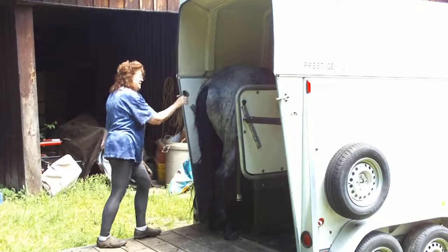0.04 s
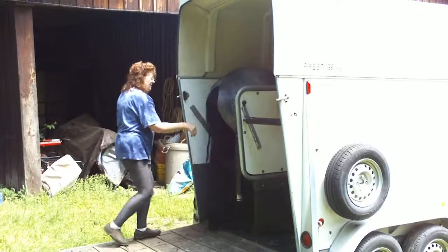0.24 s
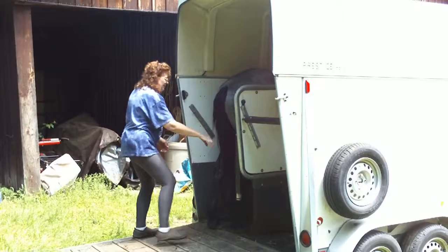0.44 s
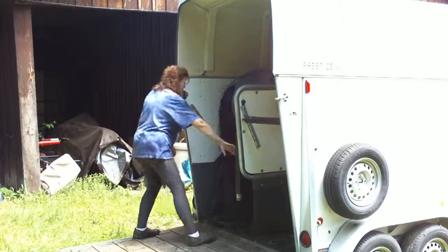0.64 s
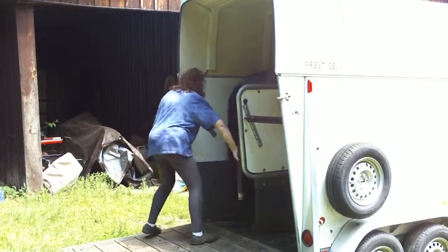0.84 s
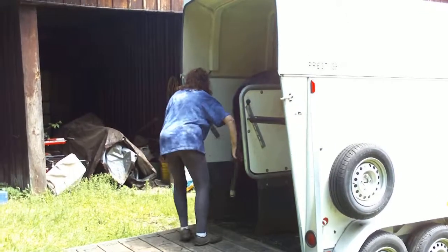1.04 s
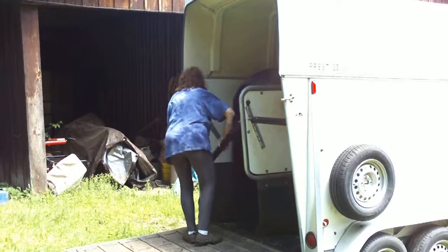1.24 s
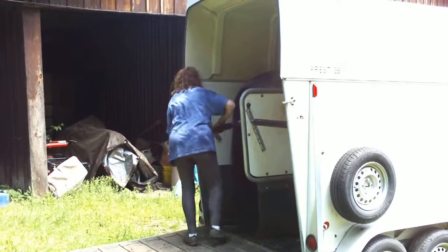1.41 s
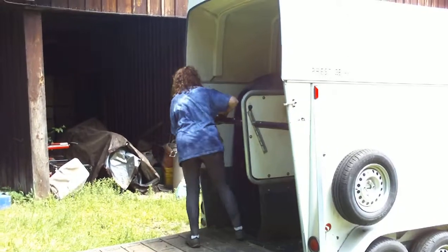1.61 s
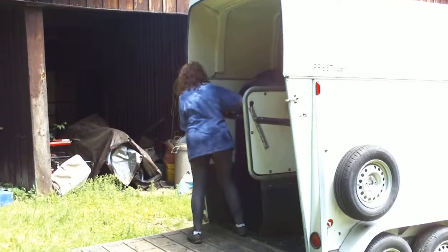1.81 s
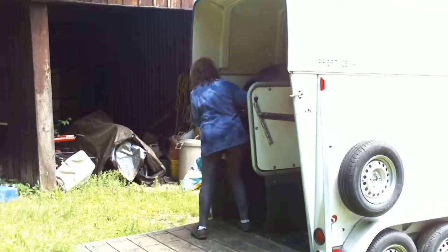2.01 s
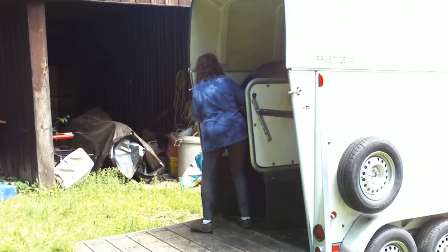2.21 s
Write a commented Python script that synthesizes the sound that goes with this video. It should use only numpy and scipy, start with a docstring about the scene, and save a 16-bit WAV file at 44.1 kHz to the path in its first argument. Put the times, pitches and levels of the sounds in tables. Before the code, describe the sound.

A horse's hooves thump on a hollow trailer floor at about 0.2, 0.5 and 0.7 seconds, then more lightly at 1.1, each with a deep boom, amid faint squeaky scuffs. From 1.1 to 1.8 seconds a metal bar scrapes across, knocking on the frame around 1.4. At 1.9 it drops into its catch with a loud rattling clank. A low rumble and soft rustle lie underneath, outdoors.

```python
"""Outdoors, over the rumble of a rocking trailer and a soft rustle, a horse stamps: each hoof clops on
the boards and sets the sprung floor booming, amid squeaky scuffs of shoes and fittings. Then a bar slides
across behind it, scraping by stick-slip friction and knocking on the frame. After a faint low groan the
bar drops into its catch with a rattling clank. Throughout, a camera that holds each sample at a low rate
adds a thin fizz above every sound."""
import sys
import numpy as np
from scipy import signal
from scipy.fft import rfft, irfft, next_fast_len
from scipy.io import wavfile

SR = 44100
rng = np.random.default_rng(int(sys.argv[2]) if len(sys.argv) > 2 else 0)


def master_out(mix):
    """Clip the mix to full scale and print it as 16-bit PCM to the path in sys.argv[1]."""
    frames = np.transpose(np.atleast_2d(mix))
    ceiling = np.clip(frames, -1, 1)
    pcm = np.round(ceiling * 32767).astype(np.int16)
    wavfile.write(sys.argv[1], SR, pcm)


N = 103635
T = np.arange(N) / SR


def amp(db):
    """The decibel law: a level as an amplitude gain."""
    return 10 ** (np.asarray(db) / 20)


def unit(x):
    """Normalisation to rms 1."""
    return x / np.sqrt(np.mean(x ** 2) + 1e-20)


def read(points, hz):
    """Interpolation of a table on a log-frequency axis."""
    f, value = np.transpose(points)
    return np.interp(np.log(hz + 1), np.log(f + 1), value)


def envelope(points):
    """Amplitude envelope: a decibel curve as gain over time."""
    return amp(np.interp(T, *np.transpose(points)))


def add(mix, onset, sound):
    """Superposition: a sound joins the mix at its onset, in seconds."""
    part = mix[max(round(onset * SR), 0):][:len(sound)]
    part += sound[:len(part)]


def fade(t60, t=T):
    """Exponential damping: 60 dB down after t60 seconds."""
    return np.exp(-np.log(1000) * t / np.maximum(t60, 1e-3))


def colour(x, spectrum):
    """Linear filtering by a spectrum, normalised to rms 1."""
    size = next_fast_len(N)
    gain = amp(read(spectrum, np.fft.rfftfreq(size, 1 / SR)))
    return unit(irfft(rfft(x, size) * gain, size)[:N])


def noise(spectrum):
    """Stationary Gaussian noise, filtered to a spectrum."""
    return colour(rng.standard_normal(N), spectrum)


def dense_ring(spectrum):
    """Frequency-dependent damping: overlapping modes ring as noise whose treble dies first."""
    # damping of the ringing (frequency [Hz], t60 [s])
    decay_times = [(100, 0.64), (400, 0.39), (1100, 0.37), (2500, 0.39), (5000, 0.28)]
    hz, t, bands = signal.stft(noise(spectrum), SR, nperseg=256)
    damping = fade(read(decay_times, hz)[:, None], t)
    return signal.istft(bands * damping, SR, nperseg=256)[1][:N]


def background():
    """Amplitude-modulated noise: the rocking trailer rumbles under a soft rustle."""
    # swells of the rumble (time [s], level [dB])
    rocking = [(0, -25), (.13, -40.5), (.46, -35), (.95, -28), (1.05, -35.5), (1.45, -27), (1.56, -35.5),
               (1.76, -31), (1.88, -47), (2.0, -39.5), (2.24, -30.5), (2.33, -50)]
    # its spectrum (frequency [Hz], relative level [dB])
    rumble_spectrum = [(20, -21), (34, 13), (50, -9.5), (65, 0.5), (140, -19), (600, -67.5)]
    # swells of the rustle (time [s], level [dB])
    rustle = [(.98, -53.5), (1.05, -56), (1.15, -52), (1.72, -53), (1.85, -55), (2.11, -49), (2.21, -52)]
    # its spectrum (frequency [Hz], relative level [dB])
    rustle_spectrum = [(60, -13.5), (200, 3), (450, -6), (1000, -10.5), (1900, -21), (5600, -29.5)]
    return envelope(rocking) * noise(rumble_spectrum) + envelope(rustle) * noise(rustle_spectrum)


def groan(onset=1.68, length=0.188, hz=138, db=-39.5):
    """A low pure tone swells and fades under an arched envelope."""
    progress = np.clip((T - onset) / length, 0, 1)
    arch = np.sqrt(abs(np.sin(np.pi * progress)))
    return amp(db) * arch * np.sin(2 * np.pi * hz * T)


def scuffs():
    """Friction of shoes and fittings: brushing noise and a rough squeak of falling pitch."""
    # strokes (time [s], length [s], brush level [dB], squeak level [dB])
    strokes = [(0.102, 0.07, -53.5, -51.5), (0.366, 0.076, -55.5, -54), (0.954, 0.056, -57, -88),
               (1.073, 0.07, -59.5, -60), (1.199, 0.065, -57.5, -63)]
    # brushing noise (frequency [Hz], relative level [dB])
    brush_spectrum = [(400, -12), (1600, -6), (3100, -3.5), (3700, -10), (6000, -18.5)]
    squeak_hz, sag_hz_per_s, width_hz, edge_s = 2843, 2600, 170, 0.017
    pole = np.exp(-np.pi * width_hz / SR)
    out = np.zeros(N)
    for onset, length, brush_db, squeak_db in strokes:
        gate = np.clip(np.minimum(T, length - T) / edge_s, 0, 1)
        jitter = unit(signal.lfilter([1], np.poly([pole, pole]), rng.standard_normal(N)))
        hz = squeak_hz - sag_hz_per_s * (T - length / 2) + width_hz / 2 * jitter
        squeak = np.sin(2 * np.pi * np.cumsum(hz) / SR)
        add(out, onset, gate * (amp(brush_db) * noise(brush_spectrum) + amp(squeak_db) * squeak))
    return out


def bar_slide():
    """Stick-slip friction: dense random impulses excite the panels and the bar's own modes."""
    # sliding (time [s], level [dB])
    sliding = [(1.07, -94), (1.11, -44.5), (1.19, -49.5), (1.345, -39.5), (1.37, -38), (1.44, -27.5),
               (1.51, -40.5), (1.6, -45), (1.72, -46), (1.82, -74)]
    # its spectrum (frequency [Hz], relative level [dB])
    slide_spectrum = [(50, -24.5), (110, 16), (330, 0.5), (520, -5.5), (800, -2), (1280, -21), (1620, -9.5),
                      (1800, -25.5), (2850, -26.5), (3400, -51), (5600, -52)]
    # grinding where the bar binds (time [s], level [dB])
    grinding = [(1.24, -59), (1.3, -49), (1.35, -51), (1.372, -37.5), (1.45, -50), (1.66, -87)]
    # its spectrum (frequency [Hz], relative level [dB])
    grind_spectrum = [(400, -11), (850, 1.5), (1620, -6.5), (1900, -19.5), (2850, -14.5), (3500, -34)]
    # modes of the bar (frequency [Hz], relative level [dB])
    bar_modes = [(134, -7), (188, -9), (273, -9), (326, -13), (415, -16)]
    slips_per_s, spread_db, bar_db = 290, 4, 0.5
    slips = (rng.random(N) < slips_per_s / SR) * rng.choice([-1, 1], N)
    slips = slips * amp(spread_db * np.minimum(rng.exponential(1, N), 3))
    panel_response = (rng.standard_normal(N) * fade(t60=0.13))[:SR // 4]
    grit = signal.fftconvolve(slips, panel_response)[:N]
    out = colour(grit, slide_spectrum) * envelope(sliding)
    out += colour(grit, grind_spectrum) * envelope(grinding)
    force = unit(slips) * envelope(sliding)
    for hz, db in bar_modes:
        mode = fade(t60=0.19) * np.sin(2 * np.pi * hz * T)
        out += amp(bar_db + db) * signal.fftconvolve(force, mode / np.linalg.norm(mode))[:N]
    return out


def bar_clanks():
    """Impact excitation: each blow of the bar cracks, rings the frame's modes and rattles the panels."""
    # blows on the frame and catch (time [s], relative level [dB])
    blows = [(1.363, -17), (1.385, -16.5), (1.454, -19), (1.9215, -0.5), (1.930, -2.5), (1.937, 0.5),
             (1.947, -2.5), (1.979, -28)]
    # modes of frame and walls (frequency [Hz], relative level [dB], t60 [s])
    frame_modes = [(188.5, -3, .45), (252, -6, .34), (299, -6, .3), (365, 0, .25), (448, -6, .22),
                   (726, -10, .25), (866, -10, .28), (903, -8, .25), (957, -7, .25), (1093, -11, .3),
                   (1228, -13, .28), (1466, -5, .15)]
    # dense panel ringing (frequency [Hz], relative level [dB])
    panel_spectrum = [(60, -7.5), (120, 5), (200, 2.5), (370, 2), (520, -16.5), (720, -5.5), (950, -6.5),
                      (1200, -9), (1550, -10), (1780, -24), (2850, -27), (3700, -41.5), (5000, -33),
                      (5600, -45.5)]
    rattle_db, frame_db, crack_db = -25.5, -28.5, -16.5
    ring = sum((-1) ** k * amp(db) * fade(t60) * np.sin(2 * np.pi * hz * T)
               for k, (hz, db, t60) in enumerate(frame_modes))
    attack = -np.expm1(-T / 0.0004)
    out = np.zeros(N)
    for onset, db in blows:
        rattle = amp(rattle_db) * dense_ring(panel_spectrum)
        crack = amp(crack_db) * fade(t60=0.074) * noise(panel_spectrum)
        add(out, onset, amp(db) * attack * (rattle + amp(frame_db) * ring + crack))
    return out


def hoof_clops():
    """Impact and resonance: a dull knock, its tail in the trailer, and the hollow boards beneath."""
    # hooves meeting the boards (time [s], knock level [dB], body level [dB])
    hoof_falls = [(.163, -39.5, -31), (.496, -35.5, -53.5), (.518, -32.5, -24), (.701, -38.5, -31.5),
                  (.727, -47.5, -38.5), (0.826, -47.5, -43.5), (0.918, -48, -72), (1.121, -35, -36.5),
                  (1.148, -44.5, -49), (1.67, -45.5, -40), (2.309, -48.5, -49)]
    # the knock (frequency [Hz], relative level [dB])
    knock_spectrum = [(100, -26), (300, 6), (500, -5.5), (750, 5), (1100, 1), (1600, -2), (1850, -18.5),
                      (2600, -20), (4000, -40.5)]
    # the boards' hollow body (frequency [Hz], relative level [dB])
    body_spectrum = [(20, -14), (70, -22), (120, 3), (190, -10.5), (450, -24), (1500, -79.5)]
    tail_db = -6.5
    attack = -np.expm1(-T / 0.00042)
    body_envelope = -np.expm1(-T / 0.0018) * fade(t60=0.58)
    out = np.zeros(N)
    for onset, knock_db, body_db in hoof_falls:
        knock = fade(t60=0.062) * noise(knock_spectrum)
        tail = amp(tail_db) * dense_ring(knock_spectrum)
        body = body_envelope * noise(body_spectrum)
        add(out, onset, amp(knock_db) * attack * (knock + tail) + amp(body_db) * body)
    return out


def floor_booms():
    """Free vibration: a blow shoves the sprung floor, which then booms; higher modes answer first."""
    # hooves and other jolts (time [s], relative level [dB], pitch factor [ratio])
    jolts = [(.171, 0, 1), (.523, 2, 1.13), (0.708, 1.5, 1.02), (1.128, -9.5, 0.83), (1.195, -19, 1.35),
             (0.337, -16.5, 0.85), (0.943, -28, .95), (1.286, -17, 0.706), (1.984, -10.5, 1.06)]
    # modes of the floor (frequency [Hz], relative level [dB], t60 [s], swell time [s])
    floor_modes = [(38.1, 7, 0.32, 0.092), (54.7, -7.5, 0.3, 0.086), (68.6, 7, 0.13, 0.037),
                   (79.6, -19, 0.55, 0.02), (118.46, -12, 0.18, 0.022), (169.5, -37, 0.37, 0.021)]
    shove_lead_s, shove_peak_s, shove_hz = 0.012, 0.0088, 66
    shove_db, floor_db = -16, 1
    out, t = np.zeros(N), T[:SR]
    shove = t / shove_peak_s * np.exp(1 - t / shove_peak_s) * np.sin(2 * np.pi * shove_hz * t)
    for onset, db, pitch in jolts:
        add(out, onset - shove_lead_s, amp(db + shove_db) * shove)
        for hz, mode_db, t60, swell_s in floor_modes:
            swell = -np.expm1(-(t / swell_s) ** 2)
            mode = fade(t60, t) * np.sin(2 * np.pi * hz * pitch * t)
            add(out, onset, amp(floor_db + db + mode_db) * swell * mode)
    return out


def scene():
    """Superposition in two equal channels: everything comes from straight ahead."""
    mono = floor_booms() + hoof_clops() + bar_clanks() + bar_slide() + groan() + scuffs() + background()
    return np.array([mono, mono])


def record(dry):
    """Spectral imaging: a zero-order hold mirrors the sound into the treble; hiss and a low-pass follow."""
    # hiss, independent in each channel (frequency [Hz], relative level [dB])
    hiss_spectrum = [(100, 23), (1000, -10.5), (3000, -2), (14000, -14)]
    hold_hz, band_limit_hz, hiss_db = 12000, 15150, -66
    anti_alias = signal.firwin(8001, 5600, fs=hold_hz * 147)
    slow = signal.resample_poly(dry, 40, 147, axis=1, window=anti_alias)  # down to the hold rate
    staircase = np.repeat(slow, 21, axis=1)
    held = signal.resample_poly(staircase, 7, 40, axis=1)[:, :N]  # back to SR
    hiss = amp(hiss_db) * np.array([noise(hiss_spectrum), noise(hiss_spectrum)])
    low_pass = signal.firwin(511, band_limit_hz, window=("kaiser", 9), fs=SR)
    return signal.oaconvolve(held + hiss, low_pass[None], "same")


dry = scene()
out = record(dry)
master_out(out)
```